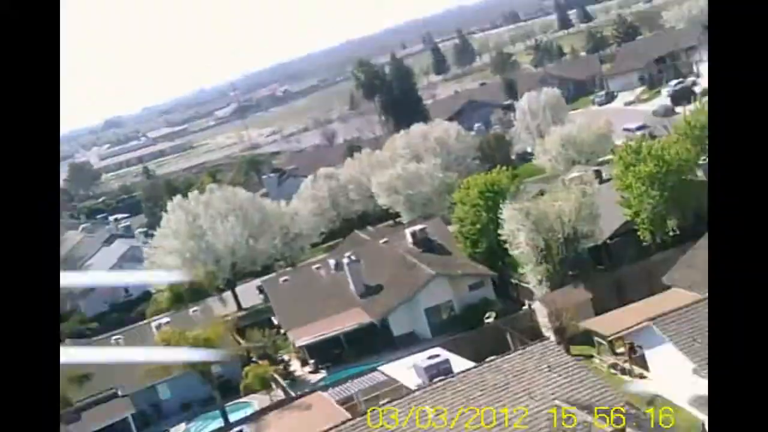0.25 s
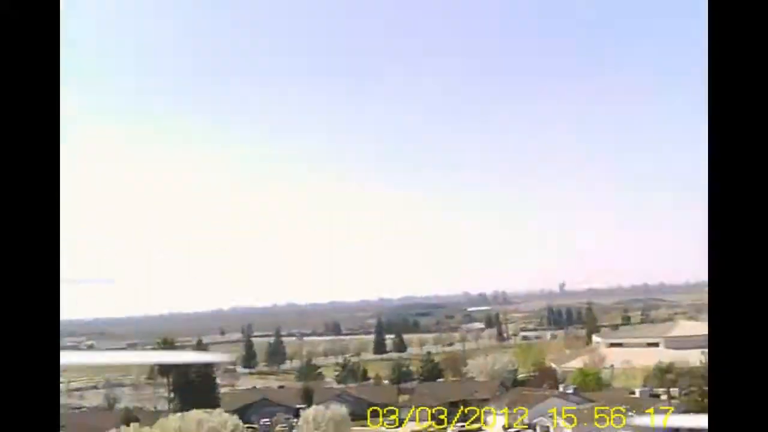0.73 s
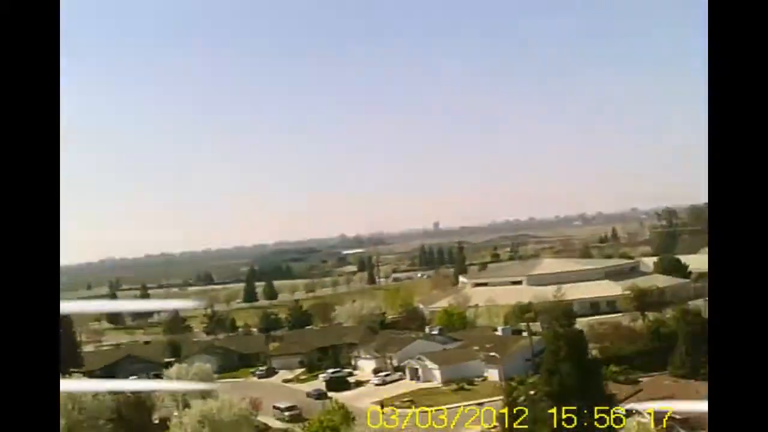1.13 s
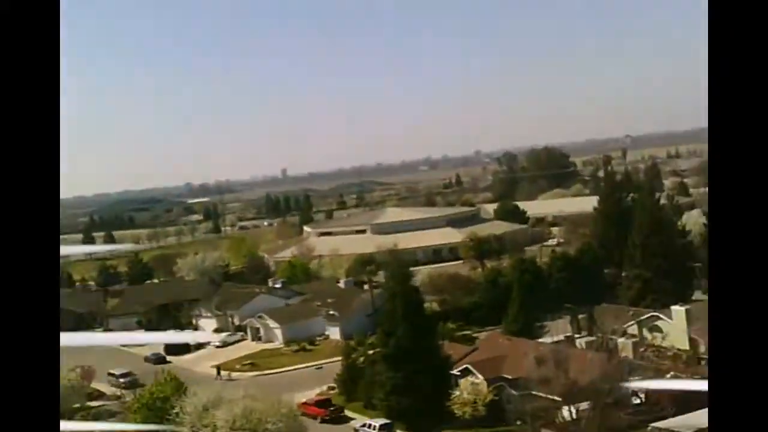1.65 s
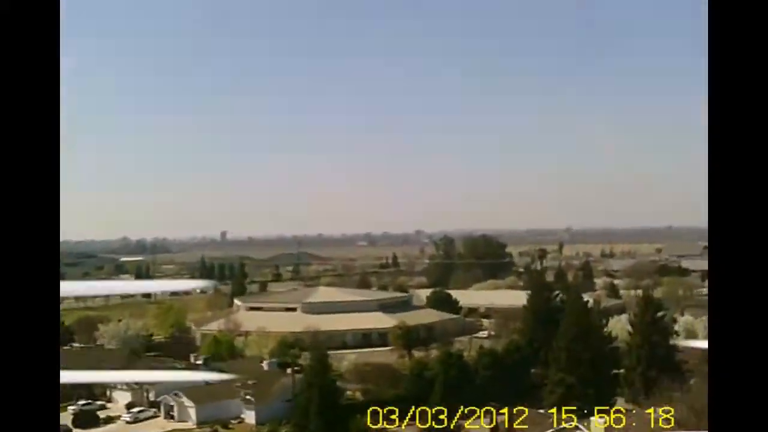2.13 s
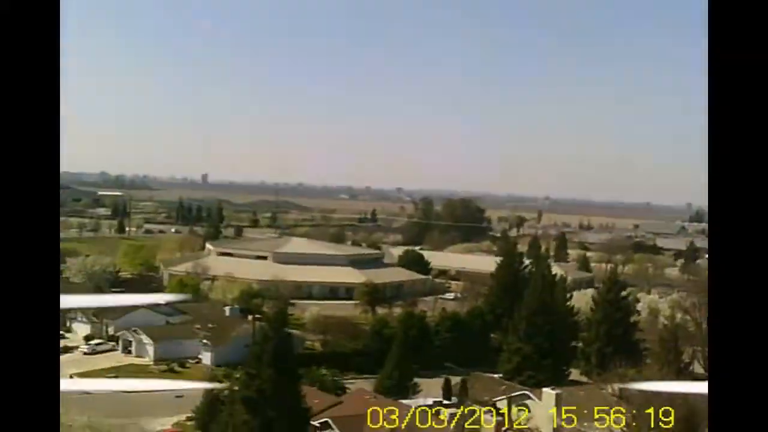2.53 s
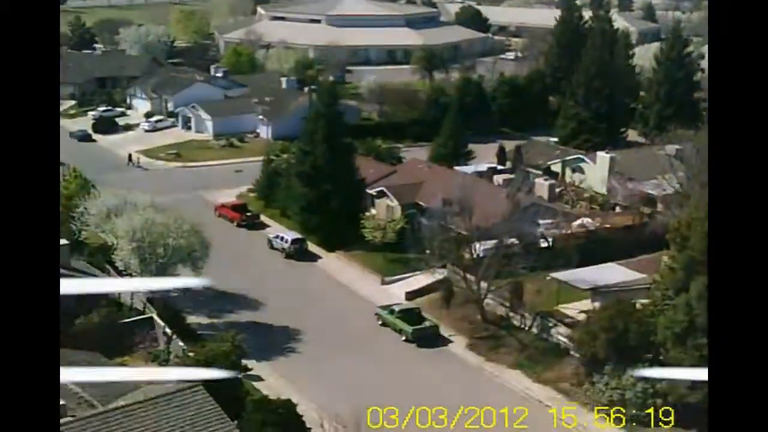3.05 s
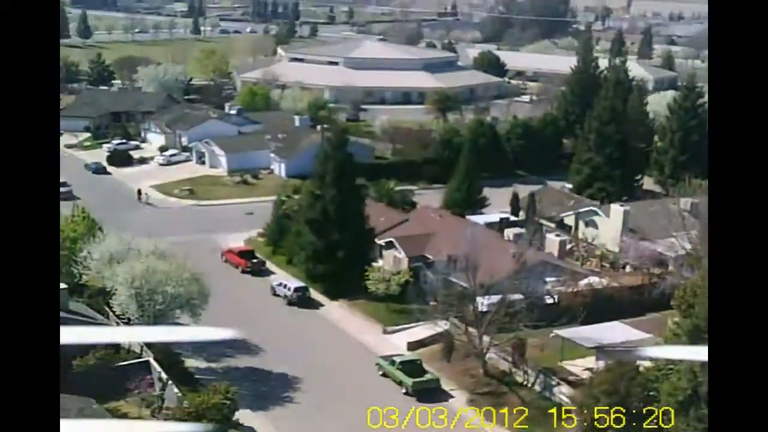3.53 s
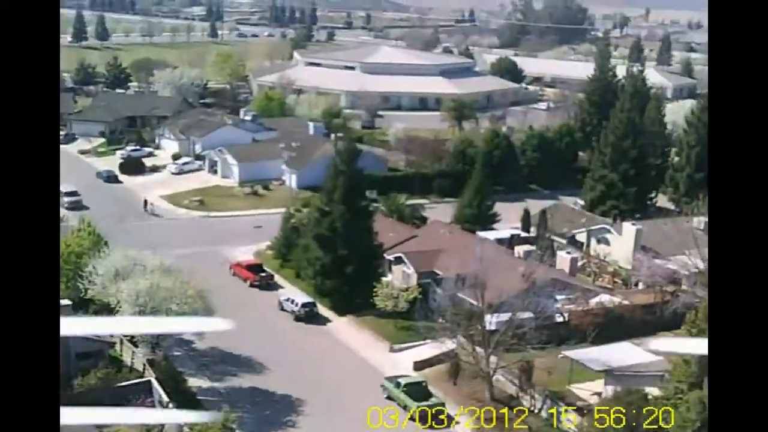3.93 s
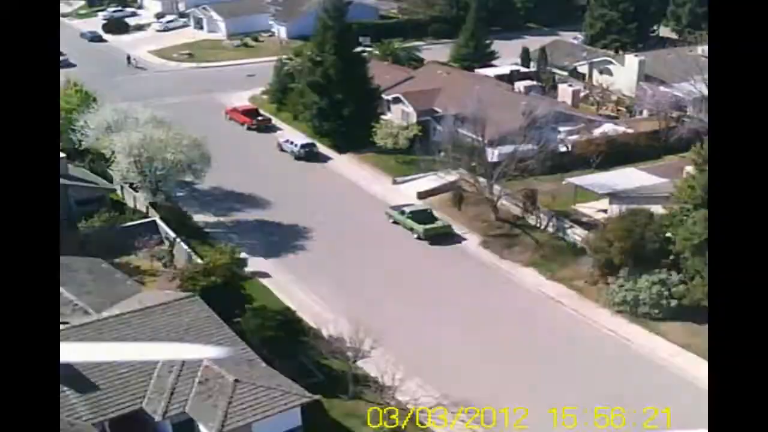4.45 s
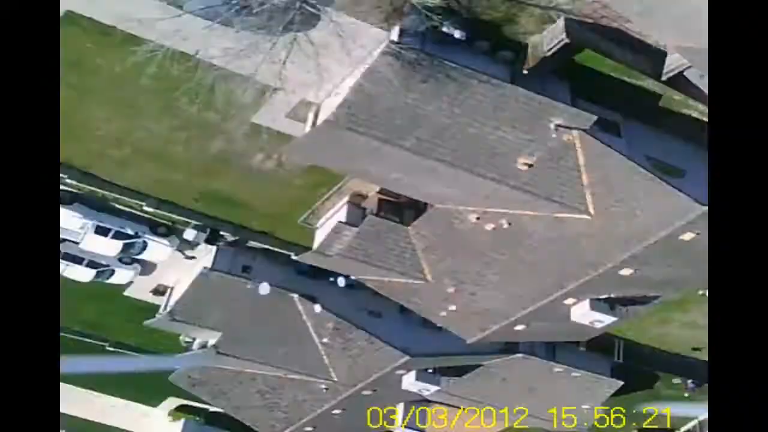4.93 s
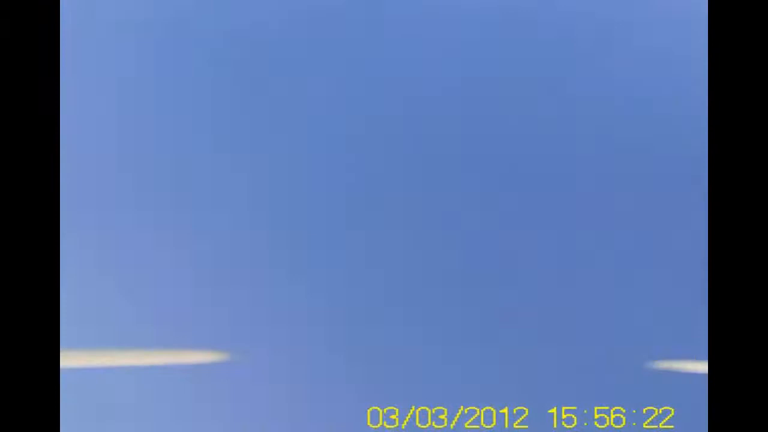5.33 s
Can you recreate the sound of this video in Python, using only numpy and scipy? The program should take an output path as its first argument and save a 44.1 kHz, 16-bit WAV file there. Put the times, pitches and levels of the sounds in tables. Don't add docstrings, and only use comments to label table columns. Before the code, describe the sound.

Very close, dry and low-fidelity: a small rotor buzzes rapidly over rattling plastic gears, faint far-propeller hum and a fixed high electronic tone. After a strong climb it settles lower. Near the end power is cut for a tumble, the buzz slows and fades, then labours back with sharp knocks and wind thumps.

```python
import sys
import numpy as np
from scipy import signal
from scipy.fft import rfft, irfft, next_fast_len
from scipy.io import wavfile
from scipy.ndimage import uniform_filter1d

SR = 44100
rng = np.random.default_rng(int(sys.argv[2]) if len(sys.argv) > 2 else 0)


def pcm_store(signal):
    levels = np.round(np.clip(np.atleast_2d(signal), -1, 1) * 32767)
    wavfile.write(sys.argv[1], SR, levels.astype(np.int16).T)


def invert_db(level):
    return 10 ** (np.asarray(level, dtype=float) / 20)


N = 246059
T = np.arange(N) / SR

# start and end of each change, s
CLIMB_ENDS, TUMBLE_STARTS, POWER_CUT = (1.0, 1.3), (4.3, 4.42), (4.6, 4.72)
SPOOL_UP, POWER_ON, WAKE = (4.9, 5.04), (5.11, 5.16), (5.2, 5.44)

# level flight, then what is added in climb and from tumble, power cut, spool-up,
# power on and wake onward.
# Low rumble of the wind [level/dB]
WIND_DB = (-53, 6.5, 8, 7.5, -3, 2.5, 9.5)
RUSH_DB = (0.1, 1.1, .1, .1, .1, 1.5, 2.5)
WASH_DB = (-40.7, 1.1, 2.2, -10, .6, 7.5, 5)
TONE_DB = (-48.5, -7.5, 0.3, -11, 3, 11, 2.5)
OCTAVE_DB = (-64.5, .1, 1.1, -1.5, 4, 8, 2.5)
GEAR_DB = [(-31.3, .9, .1, -4.5, 3.5, -1.5, 6), (-40.5, -1.5, 0.6, -5.5, 3.5, 2.5, .6),
           (-42.2, -.8, -6.5, -2, 2.2, -2.5, -2.5), (-48.2, .1, -1.1, -1.1, 1.2, .8, 1.8)]
SLACK = (0.13, 0.034, .14, 0.14, -.14, .05, -.1)

# [t/s, added level/dB]
GUSTS = [(0, 6), (.98, 1), (2.38, 4), (2.55, 5), (2.94, 3), (3.54, 8), (3.63, 6), (3.93, 5), (4.05, 6),
         (4.7, 5), (5.25, 3)]
# [f/Hz, level/dB per Hz]
BUFFET = [(15, -14), (30, 9.5), (50, 3.5), (110, 2), (200, -4.5), (400, -10), (800, -16.5), (1400, -31),
          (2500, -35)]
# [f/Hz, level/dB per Hz]
WASH = [(250, -17), (400, 1.5), (700, -3.5), (1000, 2.5), (1300, -3), (1700, -35)]
# [t/s, signed peak/full scale, half width/ms]
SLAPS = [
    (5.376, -.3, 1.2),
    (5.4415, .5, .7),
    (5.479, -.35, 1.8),
]
# [t/s, length/s, pass rate f/Hz, bow f/Hz, level/dB]
FAR = [
    (0, 1.15, 133, -21, -36.5),
    (.3, .8, 129, 11, -40),
    (1.9, 1.1, 133, -3, -44),
    (3, 1, 130, -11, -42),
    (5.31, .21, 139, 11, -28),
    (4.3, .17, 145, 7, -43),
]
# [f/Hz, level/dB per Hz]
FRAME_LOW = [(740, -35), (1250, -8.5), (1390, -4.5), (1800, 3.5), (2500, -4), (2780, -11.5), (3100, -20),
             (4030, -43), (6820, -120)]
FRAME_MID = [(1820, -50), (3100, -11.5), (3530, -1.5), (3810, -5), (3840, -2.5), (4400, -4.5), (5720, -33),
             (9680, -120)]
FRAME_UPPER = [(2590, -30), (4400, -1), (4550, -4), (4730, -4), (5400, -12.5), (7020, -44), (11900, -120)]
FRAME_HIGH = [(3180, -38), (5400, -2.5), (6040, -2.5), (6680, -9.5), (7500, -3), (8310, -8.5), (9010, -3.5),
              (9490, -9), (9930, -16), (10900, -12.5), (11700, -21.5), (15200, -54), (22000, -120)]
# [t/s, f/Hz]
WHINE = [(.45, 4230), (.62, 4660), (1.1, 4290), (1.25, 4350), (1.4, 4320), (1.7, 4600), (1.92, 4370),
         (2, 4400), (2.25, 4250), (2.42, 4430), (2.6, 4390), (2.8, 4480), (3, 4390), (3.25, 4490),
         (3.5, 4520), (4.1, 4280), (4.25, 4300), (4.35, 4500)]
# [t/s, length/s, start f/Hz, end f/Hz, bow f/Hz]
STRANDS = [(.08, .26, 4180, 4230, 140), (.7, .42, 4780, 4960, 130), (1.02, .33, 4860, 4480, 30),
           (.9, .4, 3960, 4310, 30), (1.65, .5, 4240, 4440, 90), (2.1, .55, 4200, 4300, 40),
           (2.6, .55, 4260, 4080, 0), (2.75, .45, 4500, 4480, -60), (3.15, .85, 4120, 4180, 60),
           (3.6, .72, 4570, 4830, 100), (3.8, .52, 4880, 5020, 20), (4.97, .16, 4330, 4300, 100),
           (5.03, .17, 3480, 3600, 60), (5.1, .14, 3600, 3620, 30), (5.18, .15, 3560, 3620, 50),
           (5.26, .14, 3440, 3400, 40), (5.36, .13, 3600, 3500, 90), (5.44, .14, 3420, 3600, -40),
           (5.36, .14, 3750, 3780, 40)]
# [t/s, peak level/dB, ring f/Hz]
KNOCKS = [(4.412, -21, 1920), (4.54, -21, 1780), (4.624, -21, 1500), (4.663, -23, 1600), (4.69, -27, 900),
          (5.14, -25, 950), (5.333, -14, 1790), (5.391, -18, 1820)]
# [t/s, pass rate f/Hz]
NEAR = [(0, 146.3), (.15, 154.4), (.4, 160.3), (.52, 153), (.62, 157), (.99, 155.6), (1.35, 137.6),
        (1.6, 136.9), (1.75, 141), (1.96, 140.2), (2.13, 138.6), (2.29, 135), (2.5, 137.3), (2.86, 140),
        (3.05, 137.2), (3.5, 141.3), (3.78, 139.6), (4.24, 134.2)]
# [t/s, level/dB]
NEAR_DB = [(0, -22.5), (.17, -18.3), (.7, -19), (1.1, -21.5), (1.45, -24), (1.75, -22.5), (2.1, -24),
           (2.5, -26.5), (2.9, -22.5), (3.04, -24.5), (3.3, -22.5), (3.7, -22), (4.2, -24)]
# [t/s, added f/Hz]
NUDGES = [(1.19, 1.5), (1.66, -.8), (2.38, 1.1), (3.16, 1.2), (3.27, 1.3), (3.38, -1), (4, -.6)]
# [t/s, pass rate f/Hz, level/dB]
CUT = [(4.27, 133, -23.5), (4.37, 114, -26), (4.47, 121, -26.5), (4.63, 100, -34), (4.77, 86, -40),
       (4.89, 91, -42), (5.01, 85, -44.5), (5.1, 90, -37.5)]
# [t/s, pass rate f/Hz, level/dB]
RECOVERY = [(5.18, 97, -34), (5.24, 102, -26), (5.29, 105, -22), (5.33, 108.5, -29), (5.38, 115.5, -23),
            (5.43, 119, -20), (5.46, 117, -23), (5.51, 109, -19.5), (5.58, 101.6, -22)]


def read(rows):
    s, *columns = np.transpose(rows)
    return [np.interp(T, s, column) for column in columns]


def staged(rule):
    spans = CLIMB_ENDS, TUMBLE_STARTS, POWER_CUT, SPOOL_UP, POWER_ON, WAKE
    climb_over, *later = (np.interp(T, span, [0, 1]) for span in spans)
    stages = [1 - climb_over] + later
    return rule[0] + sum(shift * stage for shift, stage in zip(rule[1:], stages))


def bumps(rows, width_s):
    return sum(height * np.exp(-((T - s) / width_s) ** 2) for s, height in rows)


def unit(x):
    return x / np.sqrt(np.mean(x ** 2))


def walk(rate_hz):
    k = int(SR / rate_hz)
    held = np.repeat(rng.standard_normal(N // k + 1), k)
    return unit(uniform_filter1d(uniform_filter1d(held, k), k)[:N])


def colour(x, spectrum):
    hz, db = np.transpose(spectrum)
    size = next_fast_len(N)
    log_hz = np.log(np.fft.rfftfreq(size, 1 / SR) + 1)
    gain = invert_db(np.interp(log_hz, np.log(hz), db, left=-90, right=-90))
    return unit(irfft(rfft(x, size) * gain, size)[:N])


def turns(hz):
    return np.cumsum(hz) / SR


def arch(s, length, start_hz, end_hz, bow_hz):
    u = np.linspace(0, 1, num=12)
    return np.c_[s + length * u, start_hz + (end_hz - start_hz) * u + 4 * bow_hz * u * (1 - u)]


def line(rows, db, blur_hz, flutter_db, second_db=-90):
    start, end = rows[0][0], rows[-1][0]
    on = (T > start) & (T < end)
    fade = np.minimum(np.minimum(T[on] - start, end - T[on]) / .04, 1)
    hz = read(rows)[0] + blur_hz * walk(30)
    angle = 2 * np.pi * turns(hz[on])
    level = invert_db(db + flutter_db * walk(12)[on])
    out = np.zeros(N)
    out[on] = fade * level * (np.sin(angle) + invert_db(second_db) * np.sin(2 * angle))
    return np.sqrt(2) * out


def wind():
    rumble_db = staged(WIND_DB) + bumps(GUSTS, .06)
    rush_db = staged(RUSH_DB)
    wash_db = staged(WASH_DB) + .6 * walk(6)
    eddies = colour(rng.standard_normal(N) * invert_db(2.9 * walk(25)), BUFFET)
    rumble = signal.sosfilt(signal.butter(2, 90, fs=SR, output="sos"), eddies)
    rush = eddies - rumble
    wash = colour(rng.standard_normal(N) * invert_db(1.24 * walk(120)), WASH)
    return invert_db(rumble_db + 4.0) * (rumble + invert_db(rush_db) * rush) + invert_db(wash_db + 2) * wash


def slaps():
    return sum(peak * np.exp(-(1000 * (T - s) / half_ms) ** 2) for s, peak, half_ms in SLAPS)


def far_propellers():
    return sum(line(arch(s, length, hz, hz, bow_hz), db, blur_hz=1.27, flutter_db=1.5, second_db=-8)
               for s, length, hz, bow_hz, db in FAR)


def controller():
    tone_db = staged(TONE_DB) + 1.1 * walk(5)
    octave_db = staged(OCTAVE_DB) + 1.6 * walk(5)
    octave_db = octave_db + bumps([(5.49, -10)], .045)
    angle = 2 * np.pi * turns(3981.5 + 0.84 * walk(10))
    tones = invert_db(tone_db) * np.sin(angle) + invert_db(octave_db) * np.sin(2 * angle)
    return np.sqrt(2) * invert_db(1.4 * walk(14)) * tones


def knocks():
    out = np.zeros(N)
    t = np.arange(600) / SR
    envelope = (1 - np.exp(-t / .0004)) * np.exp(-t / .004)
    for s, db, hz in KNOCKS:
        i = int(s * SR)
        out[i:i + len(t)] += invert_db(db - 2.0) * envelope * np.sin(2 * np.pi * hz * t)
    return out


def whines():
    steady, tumbling = (14, 1.8), (45, 2.5)
    out = line(WHINE, -47, *steady)
    for s, length, start_hz, end_hz, bow_hz in STRANDS:
        mean_khz = (start_hz + end_hz) / 2000
        db = -48 - 6 * (mean_khz - 4)
        waver = tumbling if s > TUMBLE_STARTS[1] else steady
        out += line(arch(s, length, start_hz, end_hz, bow_hz), db, *waver)
    return out


def gears(passes):
    loose, drift_db = staged(SLACK), .3 * walk(6)
    slack = np.clip(loose, 0, 1)
    shaft_db = 9 * slack * np.cos(np.pi * passes + .8 + 1.24 * walk(12))
    blade_db = 1.5 * np.cos(2 * np.pi * passes + 1.64)
    shake_db = shaft_db + blade_db + (0.25 + 5 * slack) * walk(60)
    out = 0
    depths = [0.78, 0.72, 0.63, 0.42]
    for spectrum, rule_db, depth in zip([FRAME_LOW, FRAME_MID, FRAME_UPPER, FRAME_HIGH], GEAR_DB, depths):
        teeth = rng.standard_normal(N) * invert_db(0.9 * walk(600) + depth * shake_db)
        level = invert_db(staged(rule_db) + drift_db + .5 * walk(16))
        out = out + level * colour(teeth, spectrum)
    return out


def dip(angle, r):
    return ((1 - r * r) / (1 - 2 * r * np.cos(angle) + r * r) - (1 - r) / (1 + r)) / r


def near_propeller():
    flip = np.array([*CUT, *RECOVERY])
    hz = read(np.r_[NEAR, flip[:, [0, 1]]])[0] + bumps(NUDGES, .05)
    db = read(np.r_[NEAR_DB, flip[:, [0, 2]]])[0] + .6 * walk(9)
    wake = np.interp(T, [POWER_ON[0], WAKE[0]], [0, 1])
    closeness = .585 - .16 * wake
    churn_db = .55 + 1.1 * wake
    passes = turns(hz * (1 + 0.0041 * churn_db * walk(40)))

    chance = rng.standard_normal((N // 100, 2)).T
    index = np.floor(passes + .5).astype(int)
    blade = (-1.) ** index
    r = np.clip(closeness + 0.027 * churn_db * chance[0][index] + 0.0021 * blade, .1, .9)

    angle = 2 * np.pi * passes + .04 * np.cos(np.pi * passes)
    suction = dip(angle, r) + invert_db(-29.0) * dip(angle - .1, 0.87)
    wave = np.mean(suction) - suction * invert_db(churn_db * chance[1][index] + 0.79 * blade)
    wobble = invert_db(-23.0) * np.cos(np.pi * passes + 3)
    return (wave + wobble) * invert_db(db - 0.59) / np.sqrt(2), passes


def scene():
    near, passes = near_propeller()
    background = wind() + slaps() + far_propellers() + controller()
    frame = knocks() + whines() + gears(passes)
    return (background + frame + near)[None, :]


def band_limit(x):
    return signal.sosfilt(signal.butter(12, 11810, fs=SR, output="sos"), x)


def record(dry):
    offset = -.0059
    mix = signal.sosfilt(signal.butter(6, 11300, fs=SR, output="sos"), dry + offset)
    return band_limit(mix)


dry = scene()
out = record(dry)
pcm_store(out)
```